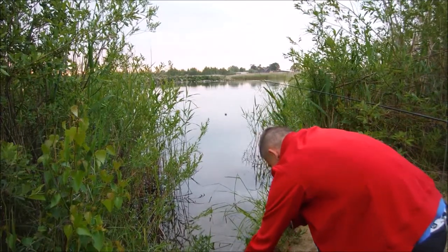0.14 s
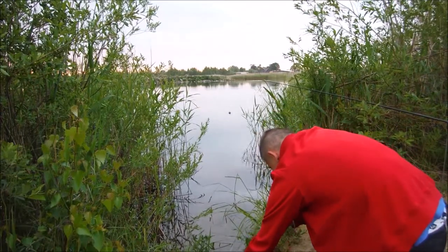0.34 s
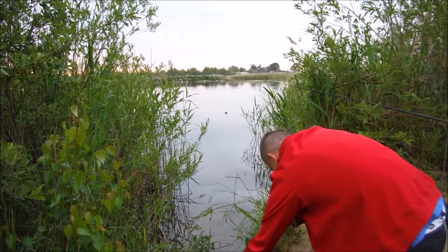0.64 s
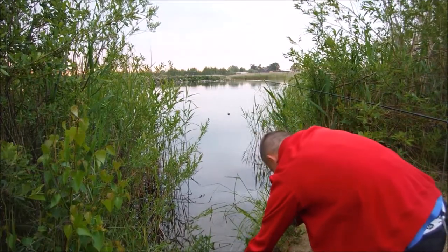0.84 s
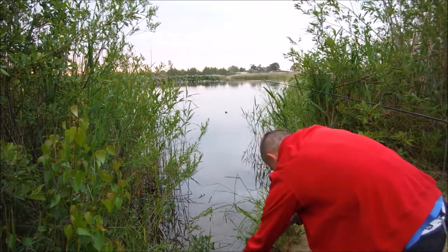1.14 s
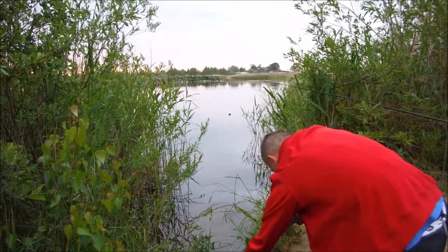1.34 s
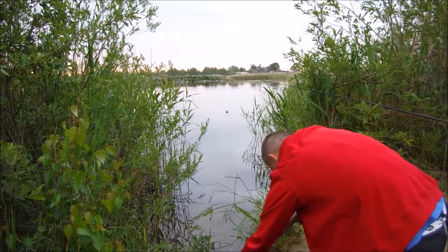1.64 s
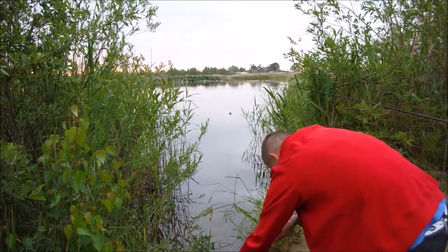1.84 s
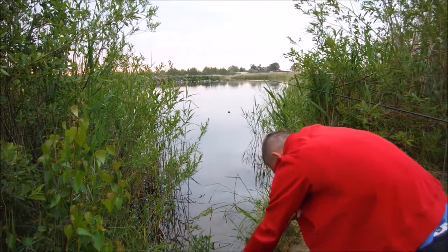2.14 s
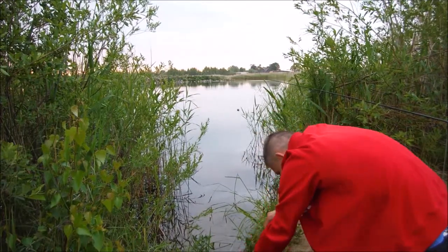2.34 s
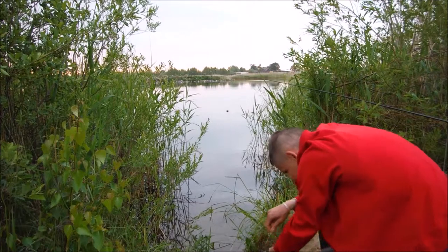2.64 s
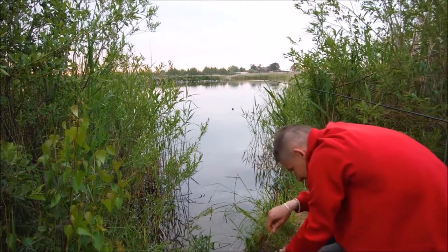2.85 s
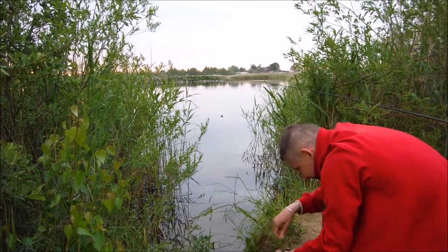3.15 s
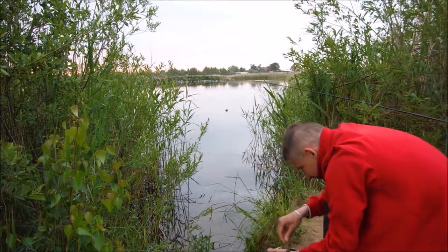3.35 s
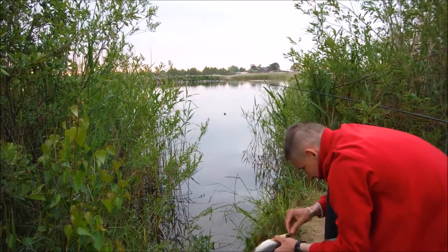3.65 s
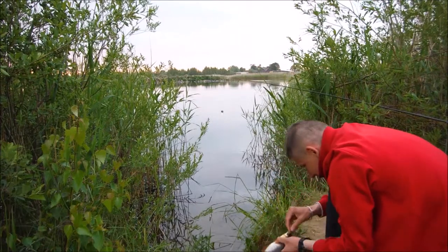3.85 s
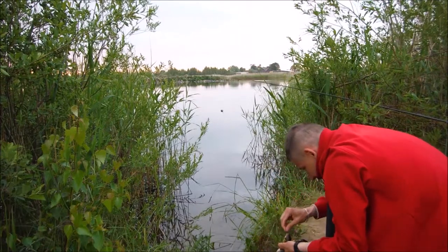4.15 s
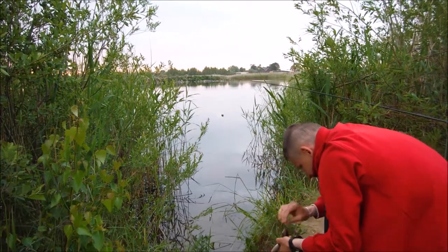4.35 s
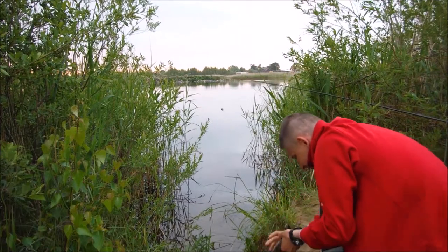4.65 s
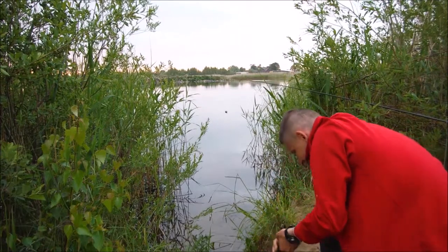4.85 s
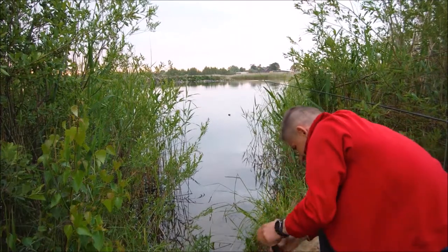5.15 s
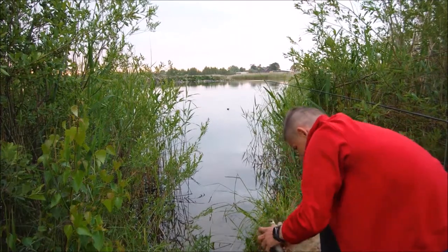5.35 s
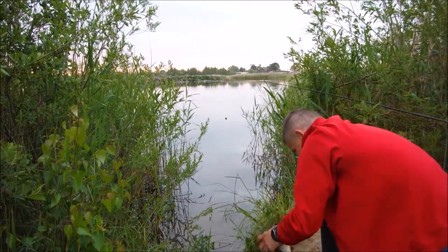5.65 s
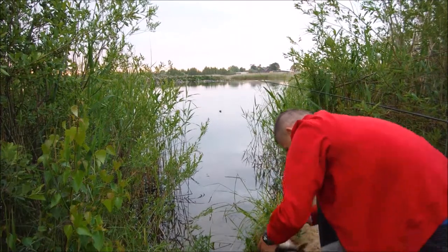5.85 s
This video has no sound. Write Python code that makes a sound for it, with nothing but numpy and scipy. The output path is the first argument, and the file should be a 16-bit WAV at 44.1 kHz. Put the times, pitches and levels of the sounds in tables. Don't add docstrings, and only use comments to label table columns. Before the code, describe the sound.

A large gull colony screams across a lake, nearer gulls crying over a continuous wavering, croaking band, with small dry ticks at the reedy bank.

```python
import sys
import numpy as np
from scipy import signal
from scipy.fft import rfft, irfft, next_fast_len
from scipy.io import wavfile
from scipy.ndimage import uniform_filter1d

SR = 44100
rng = np.random.default_rng(int(sys.argv[2]) if len(sys.argv) > 2 else 0)


def decibels_to_gain(level_db):
    exponent = np.asarray(level_db, float) / 20
    return 10 ** exponent


def dump_mix(stems):
    frames = np.atleast_2d(stems).T
    limited = np.clip(frames, -1, 1)
    pcm = np.round(limited * 32767).astype(np.int16)
    wavfile.write(sys.argv[1], SR, pcm)


N = 264379


def evened(x):
    return x / np.sqrt(np.mean(x ** 2) + 1e-20)


def read(points, hz):
    f, value = np.transpose(points)
    return np.interp(np.log(hz + 1), np.log(f + 1), value)


def curve(rows, column=1):
    return np.interp(np.arange(N) / SR, [r[0] for r in rows], [r[column] for r in rows])


def coloured(x, db_of_hz):
    size = next_fast_len(len(x))
    gain = decibels_to_gain(db_of_hz(np.fft.rfftfreq(size, 1 / SR)))
    return irfft(rfft(x, size) * gain, size)[:len(x)]


def wobble(size, hz):
    knots = rng.standard_normal(size // 40 + 2)
    return np.interp(np.arange(size) * min(hz, 500) * 2 / SR, np.arange(len(knots)), knots)


def add(mix, s, sound):
    part = mix[round(s * SR):][:len(sound)]
    part += sound[:len(part)]


def whistle(hz, db):
    return np.sqrt(2) * decibels_to_gain(db) * np.sin(2 * np.pi * np.cumsum(hz) / SR)


def swells(rows, floor_db):
    t = np.arange(N) / SR
    return decibels_to_gain(floor_db) + sum(decibels_to_gain(db) * np.exp(-((t - s) / half) ** 2) for s, db, half in rows)


def scream(hz, rough, partial_db, rattle_hz):
    size = len(hz)
    shake = .0035 * wobble(size, 60) + .14 * rough ** 2 * wobble(size, 300)
    turns = np.cumsum(hz * (1 + shake)) / SR
    rattle = np.cos(2 * np.pi * np.cumsum(rattle_hz * (1 + .15 * wobble(size, 30))) / SR)
    tone = sum(decibels_to_gain(db) * np.cos(2 * np.pi * (k + 1) * turns) for k, db in enumerate(partial_db))
    return np.sqrt(2) * tone * (1 + 1.1 * rough * rattle) * (1 + .25 * wobble(size, 25))


def cry(row, rise, bend, shut_s, uneven, rough, gape_hz, gape_db, bill_hz, bill_db, stack_db):
    start, length, first_hz, last_hz, effort_db = row
    t = np.linspace(0, 1, int(length * SR))
    arch = np.sin(np.pi * t ** .8)
    hz = (first_hz + (last_hz - first_hz) * t ** bend) * (1 + rise * arch)
    flicker_db = [1.8 * wobble(len(t), 70) for _ in range(9)]
    source = scream(hz, np.clip(rough, 0, 1), flicker_db, 67)
    source = source * decibels_to_gain(effort_db - 3 * (1.5 - arch)) * signal.windows.tukey(len(t), .17)

    def hump_db(f, mid_hz, width_hz):
        return -20 * np.log10(1 + ((f - mid_hz) / width_hz) ** 4)

    def mouth_db(f):
        gape = decibels_to_gain(gape_db + hump_db(f, gape_hz, 490))
        bill = decibels_to_gain(bill_db + hump_db(f, bill_hz, 600))
        others = decibels_to_gain(stack_db + 3.0 + hump_db(f, 4200, 1900))
        return 20 * np.log10(gape + bill + others)

    throat = coloured(source, lambda f: hump_db(f, 1900, 520))
    closing = decibels_to_gain(-9 * (t * length / shut_s) ** 2)
    beats = 1 + uneven * np.cos(np.pi * np.cumsum(hz) / SR)
    return start, throat + closing * coloured(source * beats, mouth_db)


# start in seconds, length in seconds,
# first pitch in Hz, last pitch in Hz, effort in dB.
STEADY_GULL = [(1.305, 0.14, 896, 854, -54.5), (1.809, 0.4, 944, 875, -53.5), (1.895, 0.094, 874, 867, -62),
               (2.451, 0.38, 893, 900, -54.5), (4.41, 0.15, 940, 900, -60)]
BRIGHT_GULL = [(.59, 0.15, 978, 1012, -61), (1.17, 0.21, 972, 976, -54.5), (5.661, 0.22, 916, 941, -62)]
HOARSE_GULL = [(3.09, 0.21, 890, 870, -47.5), (3.769, 0.26, 830, 870, -49), (4.65, .13, 980, 990, -53),
               (4.08, 0.25, 950, 860, -60), (4.76, .3, 920, 860, -53.5)]
CLEAR_GULL = [(3.33, 0.15, 1003, 910, -46.5), (4.03, 0.23, 1018, 817, -46), (4.66, .32, 1013, 930, -48),
              (4.82, 0.15, 930, 941, -45.5)]
RISING_GULL = [(.3, 0.25, 1049, 1075, -50.5), (1.02, 0.18, 998, 1110, -46), (3.11, 0.26, 1054, 1065, -48),
               (5.89, 0.14, 1016, 1083, -44)]
DULL_GULL = [(3.86, 0.208, 1025, 1050, -46.5), (5.26, .27, 1065, 894, -43.5)]
SHRILL_GULL = [(4.35, .2, 1013, 847, -50.5)]
SWOOPING_GULL = [(2.45, .28, 887, 1056, -49)]
THIN_GULL = [(.01, .28, 1048, 1040, -54), (3.43, .22, 1100, 1065, -55), (.35, .18, 1050, 1045, -62)]
CROAKING_GULLS = [(0.5, 0.106, 953, 943, -45.5), (0.7, 0.16, 1035, 1005, -45.5),
                  (1.44, 0.22, 1035, 890, -46), (2, 0.24, 965, 940, -44.5), (2.5, 0.18, 1037, 1045, -43),
                  (3, 0.17, 945, 925, -44), (5, 0.1, 1030, 1075, -45), (1, .28, 810, 630, -52),
                  (2.5, .24, 800, 775, -51), (.6, 0.16, 1005, 1056, -61), (2, 0.11, 985, 1005, -53),
                  (1.8, 0.2, 1015, 975, -48.5), (5, 0.13, 1055, 1040, -46), (3.76, 0.13, 1050, 1030, -44.5),
                  (4.5, 0.14, 1050, 975, -47), (5.5, .21, 940, 885, -44), (2, 0.14, 930, 1000, -46),
                  (5.56, .12, 740, 790, -49), (.6, .17, 1010, 1050, -51)]
REEDY_GULL = [(4.91, 0.27, 1070, 1028, -49)]
# arch as a share of pitch, power of the glide,
# time to shut the bill in seconds, strong-weak share from 0 to 1.
PITCH_GLIDES = [(0.037, 1.3, .45, 0.1), (0.022, 1.1, 0.25, 0.1), (.015, 1.2, 0.33, 0), (.01, 1.1, .19, 0.1),
                (.02, .7, .55, .05), (0.0056, 1.5, 0.44, 0.4), (.055, 1.8, 0.32, 0.67),
                (0.039, 0.76, 0.5, .05), (0.037, 1.01, 0.33, .05), (.01, 1.01, 0.18, .05),
                (0.01006, 1.1, 0.42, 0.4)]
# roughness from 0 to 1, gape resonance in Hz, its level in dB,
# bill resonance in Hz, its level in dB, other partials in dB.
BIRD_VOICES = [(.38, 3850, -3, 5430, -2.5, -22), (.25, 3200, 0.5, 5380, 1.5, -15),
               (.78, 4270, -7, 6900, -16, -13.5), (0.27, 3850, -8.5, 6700, -24, -31),
               (.22, 3800, -10.5, 7400, -26, -24), (.17, 6100, -24.5, 8200, -28.5, -17.5),
               (.27, 5100, -13, 8250, -15, -7.5), (0.3, 4000, -7, 5150, -11, -34),
               (.05, 3250, -2.5, 4900, -24, -26), (.45, 4000, -22, 6500, -31, -28),
               (.5, 3500, -8.5, 4800, -14, -12.5)]


def near_gulls():
    mix = np.zeros(N)
    birds = [STEADY_GULL, BRIGHT_GULL, HOARSE_GULL, CLEAR_GULL, RISING_GULL, DULL_GULL,
             SHRILL_GULL, SWOOPING_GULL, THIN_GULL, CROAKING_GULLS, REEDY_GULL]
    for bird, glide, voice in zip(birds, PITCH_GLIDES, BIRD_VOICES):
        for row in bird:
            add(mix, *cry(row, *glide, *voice))
    return mix


def lake(x, wet_db):
    t = np.arange(SR // 2) / SR
    tail = rng.standard_normal(len(t)) * decibels_to_gain(-60 * t / 0.39) * (t > .004)
    return x + decibels_to_gain(wet_db) * signal.fftconvolve(x, tail / np.linalg.norm(tail))[:len(x)]


def blended(x, share):
    z = signal.stft(x, nperseg=512)[2]
    power = uniform_filter1d(uniform_filter1d(abs(z) ** 2, size=3, axis=0), size=30, axis=1)
    gain = (power.mean(1, keepdims=True) / (power + 1e-30)) ** (share / 2)
    return signal.istft(z * gain, nperseg=512)[1][:len(x)]


def resonate(x, hz, width_hz):
    turn = np.exp(2j * np.pi * np.cumsum(hz) / SR)
    r = np.exp(-np.pi * width_hz / SR)
    return 2 * (turn * signal.lfilter([(1 - r) ** 2], [1, -2 * r, r * r], x / turn)).real


# start in seconds, pitch where the wave gathers in Hz.
ANSWERING_WAVES = [(-.05, 1990), (.42, 2040), (.72, 2040), (1.13, 2070), (1.32, 1980), (1.5, 1970),
                   (1.87, 2020), (2.36, 1990), (2.66, 2060), (3.14, 2006), (3.62, 2000), (4.02, 1945),
                   (4.4, 2080), (4.72, 2100), (5.14, 2060), (5.319, 1940), (5.74, 1960), (5.99, 2040)]


def gathering():
    gather_s, sag_s, sag_hz_per_s = .14, .27, 810
    rows = []
    for (s, hz), (after, _) in zip(ANSWERING_WAVES, ANSWERING_WAVES[1:] + [(N / SR + 1, 0)]):
        low = max(after - gather_s, s + .01)
        rows += [(s, hz), (low, hz - sag_hz_per_s * min(low - s, sag_s))]
    return curve(rows)


def steady(x):
    return x / np.sqrt(uniform_filter1d(x ** 2, size=4000) + 1e-20)


# time in seconds, level of its screams in dB.
CROWD_LEVEL = [(0.0, -44.5), (.2, -44.5), (.72, -42.5), (.93, -43), (1.25, -42.5), (1.5, -42), (1.7, -44),
               (1.95, -41.5), (2.3, -44), (2.76, -42.5), (3.05, -44), (3.28, -41.5), (3.5, -46),
               (3.8, -42.5), (4.4, -44.5), (4.72, -42), (5.0, -44.5), (5.51, -44)]
# frequency in Hz, density in dB per Hz.
COLONY_COLOUR = [(290, -46), (500, -22.5), (938, -10.5), (1250, -10), (1640, -1), (1890, -3), (2060, -2),
                 (2470, -7), (3300, -14), (4150, -14), (5350, -19), (9000, -35.5), (11700, -70),
                 (19800, -120)]


def crowd():
    mix = np.zeros(N + 2 * SR)
    for start, pitch, length, rough, size, sag in rng.random((130, 6)):
        u = np.linspace(0, 1, int((.15 + .3 * length) * SR))
        hz = (810 + 260 * pitch) * (1 + .03 * np.sin(np.pi * u) - .14 * sag * u ** 2)
        partial_db = 4 * rng.standard_normal(8) - [15, 2.5, 3.2, 3.5, 1.2, 6.9, 4.5, 0.42]
        voice = scream(hz, .55 + .4 * rough, partial_db, 62 + 10 * sag)
        add(mix, 7 * start, decibels_to_gain(4 * size) * np.sin(np.pi * u) * voice)
    mix = lake(mix[SR:SR + N], 0.0)
    mix += decibels_to_gain(4.5) * evened(rng.standard_normal(N)) * mix.std()
    mix = blended(mix, .9)
    hz, power = signal.welch(mix, SR, nperseg=2048)
    mix = coloured(mix, lambda f: read(COLONY_COLOUR, f) - 10 * np.log10(np.interp(f, hz, power)))
    upper = coloured(mix, lambda f: -10 * np.log10(1 + (2800 / (f + 1)) ** 12))
    throb = 1 + .7 * np.cos(2 * np.pi * np.cumsum(66.5 + 4 * wobble(N, 12)) / SR) + .3 * wobble(N, 9)
    lower = mix - upper + 0.8 * throb * resonate(mix, gathering(), 340)
    level_db = curve(CROWD_LEVEL)
    rasp_db = -51 + 0.73 * (level_db - level_db.mean())
    return steady(lower) * decibels_to_gain(level_db - 0.79) + steady(upper) * decibels_to_gain(rasp_db)


def camera_whine():
    t = np.arange(N) / SR
    phase = (29.98 * t + .25) % 1
    stroke = np.exp(-((phase - .1) / .08) ** 2) + 0.86 * np.exp(-((phase - .4) / 0.14) ** 2)
    tone = np.cos(2 * np.pi * np.cumsum(11210 + 25 * wobble(N, 60)) / SR)
    tone += 0.13 * np.cos(2 * np.pi * np.cumsum(11406 + 40 * wobble(N, 60)) / SR)
    return decibels_to_gain(-71.5 + 2.2 * wobble(N, 20)) * stroke * tone


# time in seconds, peak in dB.
REED_TICKS = [(0.834, -57), (2.063, -57.5), (2.5641, -56), (2.6893, -57), (2.7232, -45.5), (3.2236, -57),
              (3.8836, -54), (4.863, -39), (5.045, -58), (5.365, -58), (4.8843, -46), (4.8944, -61)]


def ticks():
    mix, t = np.zeros(N), np.arange(200) / SR
    for s, db in REED_TICKS:
        snap = np.diff(rng.standard_normal(201)) / 2.5
        add(mix, s, decibels_to_gain(db + 5 - 60 * t / 0.0016) * snap)
    return mix


# time in seconds, level in dB, half length in seconds.
SCRAPES = [
    (.18, -75, 0.076),
    (.5, -71, 0.078),
    (.68, -74, .06),
    (.84, -75, .06),
    (1.22, -75, 0.12),
    (1.8, -78, 0.23),
    (2.69, -69, 0.041),
    (2.75, -91, 0.25),
    (4.86, -83, 0.13),
]


def rustle():
    grain_db = 4.5 * np.minimum(rng.exponential(1, N), 4.5)
    grains = rng.standard_normal(N) * decibels_to_gain(grain_db) * (rng.random(N) < .15)
    dry_leaves = coloured(grains, lambda f: -40 * np.log2((f + 1) / 8500) ** 2)
    return swells(SCRAPES, -84) * evened(dry_leaves)


# time in seconds, pitch in Hz, level in dB.
SMALL_BIRD = [
    (3.7, 7511, -75),
    (3.734, 7700, -77),
    (3.768, 7784, -70),
    (3.79, 7300, -77),
]


def peep():
    t = np.arange(N) / SR
    sounding = (t > SMALL_BIRD[0][0]) * (t < SMALL_BIRD[-1][0])
    return whistle(curve(SMALL_BIRD), curve(SMALL_BIRD, 2)) * sounding


# time in seconds, level in dB, half length in seconds.
MOTOR_SWELLS = [
    (0, -67, 0.057),
    (.42, -69, 0.093),
    (1.68, -69, 0.22),
    (2.97, -75.5, 0.16),
    (3.45, -79, 0.28),
    (4.42, -72, 0.1),
    (5.27, -69, 0.1),
    (5.85, -76, 0.27),
]


def motor():
    return whistle(155 + 3 * wobble(N, 5.3), -5.0) * swells(MOTOR_SWELLS, -85)


# frequency in Hz, density in dB per Hz.
AIR_COLOUR = [(30, -9.5), (60, 0.5), (150, 3.5), (500, 6.5), (1500, 3), (6000, -19), (9600, -12.5),
              (12400, -15), (15700, -23)]


def air():
    noise = coloured(rng.standard_normal(N), lambda f: read(AIR_COLOUR, f))
    return decibels_to_gain(-61 + 1.9 * wobble(N, 3)) * evened(noise)


def scene():
    over_water = lake(near_gulls() + peep(), -9.0)
    bank = camera_whine() + ticks() + rustle()
    return (over_water + crowd() + bank + motor() + air())[None]


def starve(x, centres, window, steps):
    hop = len(window) // 2
    k, n = np.arange(hop) + .5, np.arange(2 * hop) + .5 + hop / 2
    basis = np.cos(np.pi / hop * np.outer(k, n)) * window * np.sqrt(2 / hop)
    step = decibels_to_gain(read(steps, k * SR / 2 / hop)) * 2
    padded = np.pad(x, 2 * hop)
    out = padded.copy()
    for c in centres:
        lines = basis @ padded[c + hop:c + 3 * hop]
        out[c + hop:c + 3 * hop] += (step * np.round(lines / step) - lines) @ basis
    return out[2 * hop:-2 * hop]


THIN_BLOCKS_A = [20, 27, 35, 50, 57, 63, 70, 72, 96, 118, 146, 155, 183, 196, 198, 231, 252, 258, 263]
THIN_BLOCKS_B = [58, 87, 89, 100, 103, 109, 124, 130, 154, 156, 204, 208, 219, 225, 232, 247]
# frequency in Hz, rounding step in dB.
THIN_STEP = [(200, -46.5), (700, -40), (2000, -30), (4500, -39.5), (7000, -47.5), (10000, -48),
             (15000, -65)]
THIN_RUNS = [(76, 2), (131, 2), (223, 2), (226, 2), (277, 4)]
# frequency in Hz, rounding step in dB.
THIN_RUN_STEP = [(200, -43.5), (700, -43), (2000, -32), (4500, -42), (7000, -45), (10000, -43),
                 (15000, -47)]


def thinned(x):
    def at(grid_s, blocks):
        return [round((grid_s + b * 1024 / 48000) * SR) for b in blocks]

    grid_a_s, grid_b_s = .00123, .01687
    singles = sorted(at(grid_a_s, THIN_BLOCKS_A) + at(grid_b_s, THIN_BLOCKS_B))
    runs = [at(grid_a_s, [b])[0] + 941 * k for b, blocks in THIN_RUNS for k in range(blocks)]
    x = starve(x, singles, signal.windows.cosine(1882), THIN_STEP)
    return starve(x, runs, signal.windows.kaiser_bessel_derived(1882, 4 * np.pi), THIN_RUN_STEP)


def roll_off(x):
    return signal.sosfilt(signal.butter(12, 15730, fs=SR, output="sos"), x)


def record(dry):
    mix = thinned(dry[0])[None]
    return roll_off(mix)


dry = scene()
out = record(dry)
dump_mix(out)
```